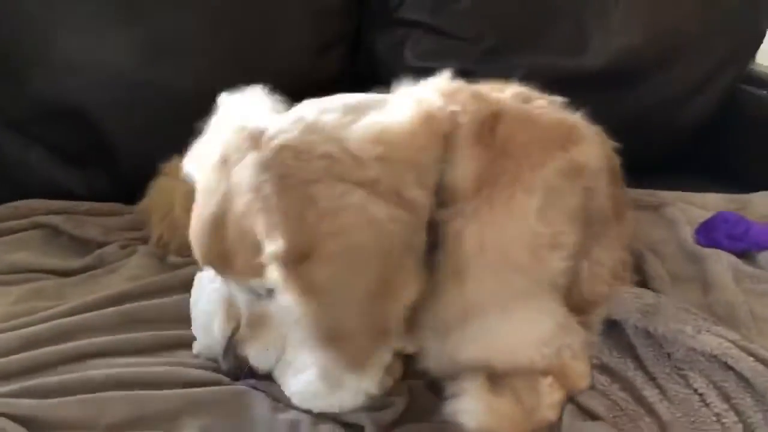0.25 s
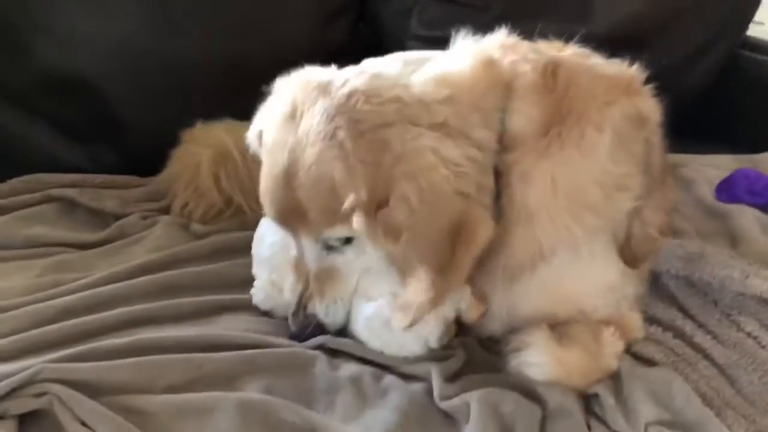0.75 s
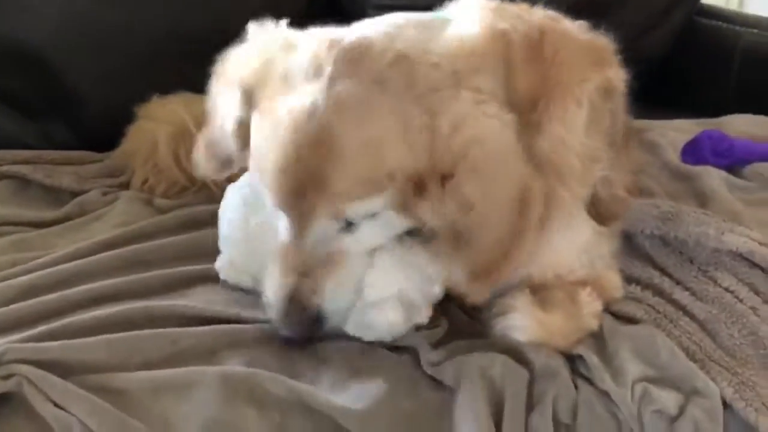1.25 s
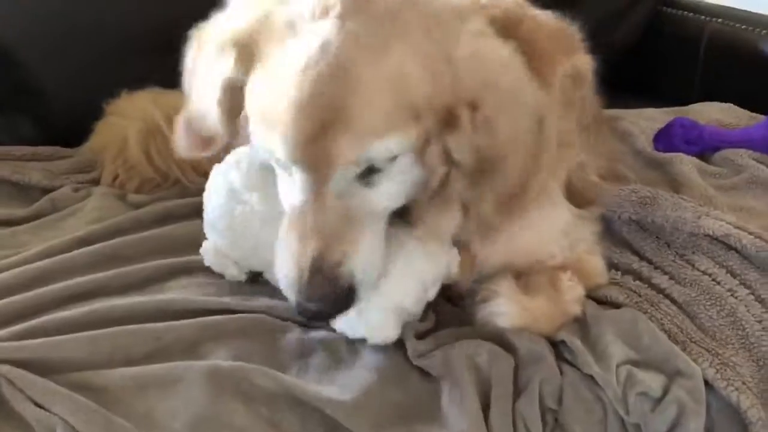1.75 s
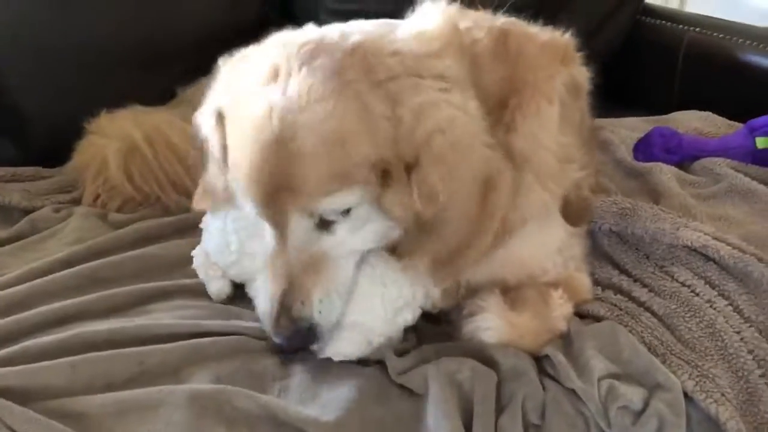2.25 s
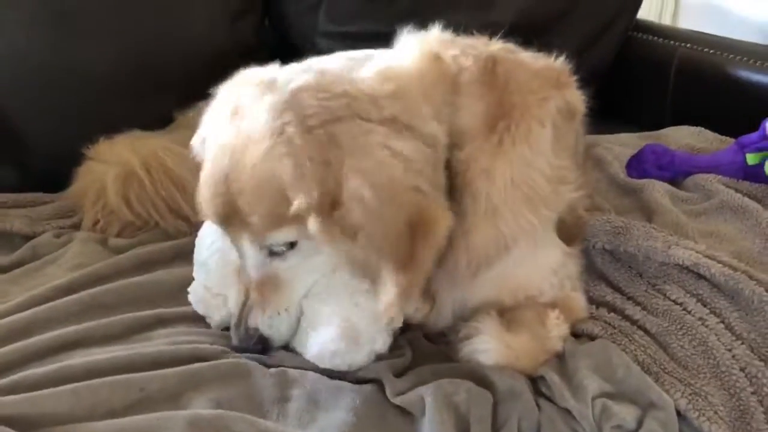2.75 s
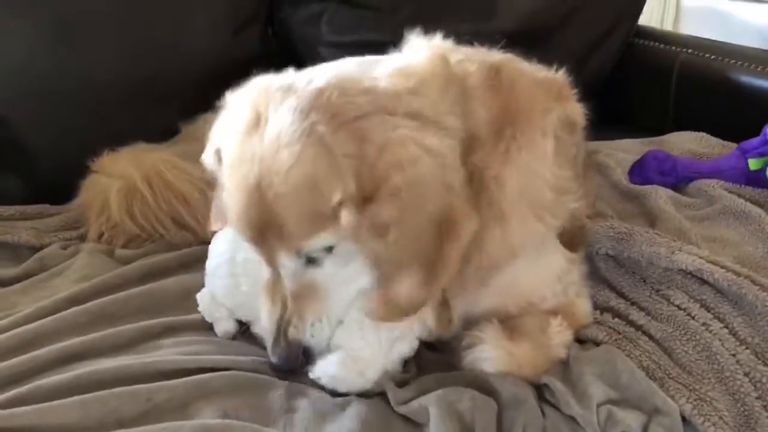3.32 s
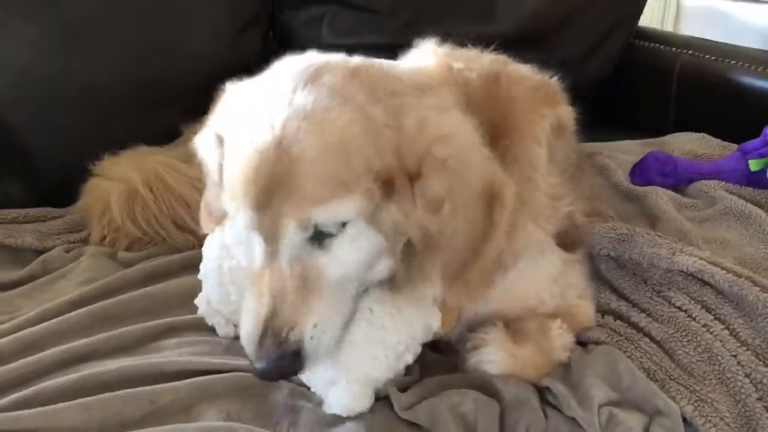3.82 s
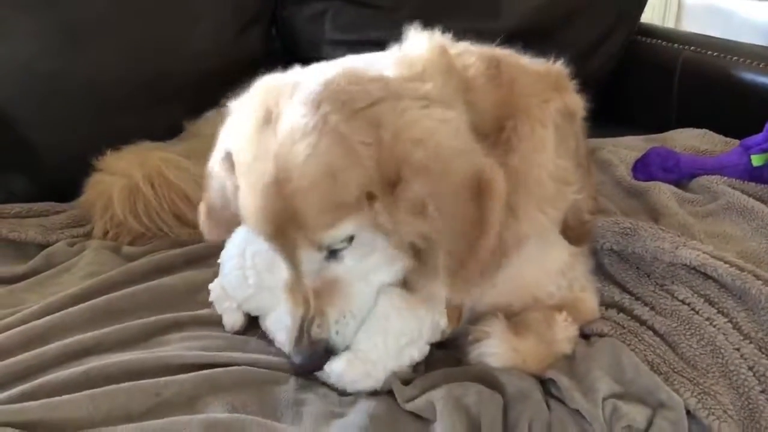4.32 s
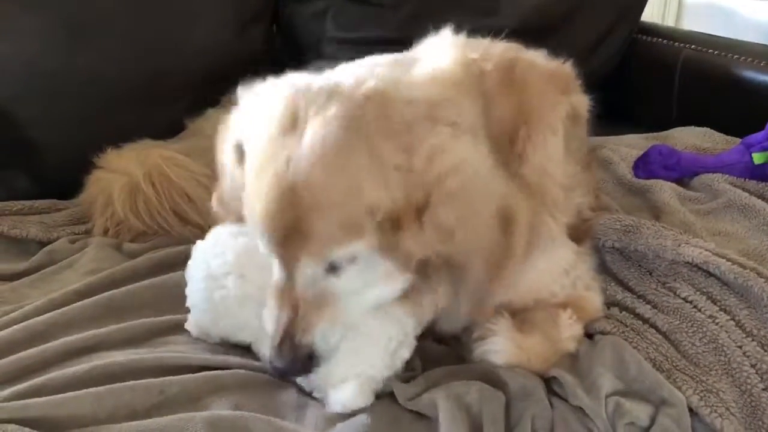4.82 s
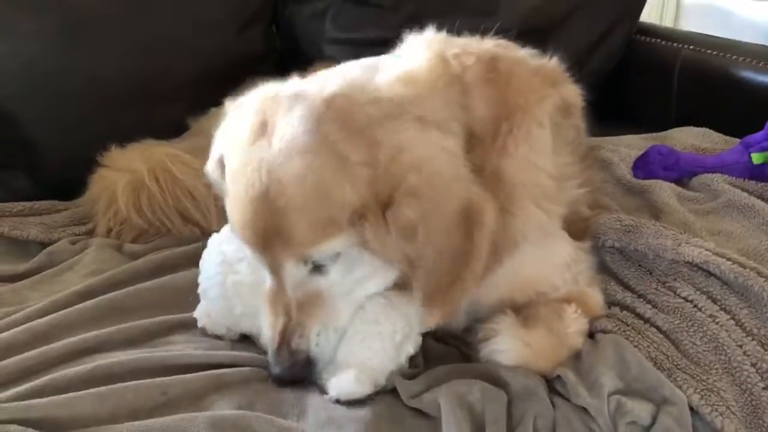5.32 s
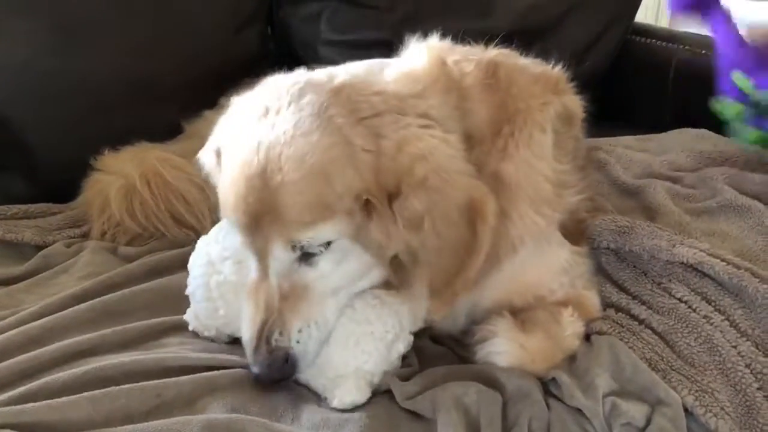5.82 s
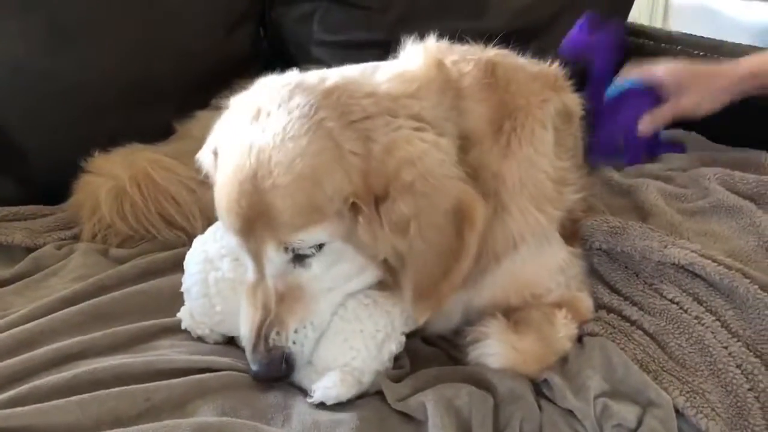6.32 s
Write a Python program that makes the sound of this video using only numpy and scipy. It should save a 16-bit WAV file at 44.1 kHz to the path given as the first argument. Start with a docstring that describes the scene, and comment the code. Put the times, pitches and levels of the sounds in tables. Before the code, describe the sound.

Close to the microphone, a dog chews a plush squeaker toy on a sofa. Each bite gives a brief, harsh, hissy squeak; most are followed by a rounder, cleaner squeak as air is sucked back in. Small pops, tooth clicks, plush rubs and soft cushion thuds fall between, with faint rustling. The room is quiet, with brief reflections and a low background hum.

```python
"""Living room: a dog on a sofa chews a squeaky plush toy, close to the microphone.
Each bite blows the squeaker's reed (harsh, pitch lifted by jaw surges); each release sucks air back
through it (rounder: rise, hold, fall). Both are beating tones with pipe-coloured overtones and hiss.
Resonant noise bursts give pops, tooth clicks, thuds and rubs; coloured noise gives rustle and room tone.
Sofa, wall and furniture add brief echoes."""
import sys
import numpy as np
from scipy import signal
from scipy.fft import rfft, irfft
from scipy.io import wavfile
from scipy.ndimage import map_coordinates

SR = 44100
rng = np.random.default_rng(int(sys.argv[2]) if len(sys.argv) > 2 else 0)


def to_wav(s):
    """Save 16-bit WAV."""
    ch = np.atleast_2d(s).T  # columns
    pcm = np.round(np.clip(ch, -1, 1) * 32767)  # PCM
    wavfile.write(sys.argv[1], SR, pcm.astype(np.int16))


N = 289911
TIME_S = np.arange(N) / SR
TOP_HZ = 15900

# Room background spectrum: [hz, relative_db_per_hz]
ROOM_TONE_COLOUR = [(15, -50), (25, -30), (55, -4.5), (78, -8), (104, 1), (178, -9), (209, -5.5), (281, -7),
                    (331, -9), (631, -16), (684, -24), (1900, -29), (2700, -29.5), (4500, -32.5),
                    (6050, -32), (8580, -35), (15500, -37.5)]
ROOM_TONE_DB = -64
# Room reverberation by band: [centre_hz, t60_s, level_db]
ROOM_BANDS = [(250, 0.79, -5), (1285, 0.45, -12.5), (2280, 0.39, -7), (4400, 0.5, -16), (8000, 0.34, -14),
              (14000, 0.13, -5.5)]
# First bounces off the leather sofa and the wall behind it: [delay_s, level_db]
BOUNCES = [(.0031, -38.5), (.0058, -19), (.0089, -17), (0.0149, -16.5)]
# Dense short echo from cushions and furniture close by
SCATTER_T60_S, SCATTER_DB, SCATTER_HIGHPASS_HZ = 0.039, -13.5, 2290

# Fur and fabric rustle as the dog shifts its grip: [centre_s, half_width_s, level_db]
SHIFTS = [(.05, 0.23, -71.5), (.68, 0.13, -65), (1.78, 0.25, -60), (2.34, 0.11, -64), (2.61, .17, -60),
          (3.1, 0.48, -69), (3.74, 0.051, -56), (4.06, 0.12, -62), (4.69, .15, -58.5), (5.14, 0.17, -58.5),
          (5.7, .17, -57), (6.2, 0.4, -60)]
RUSTLE_REST_DB = -72
# Rustle spectrum: [hz, relative_db]
RUSTLE_COLOUR = [(100, -20), (220, -1), (420, 0.5), (700, -2), (1300, -1.5), (2000, -9), (6000, -14.5),
                 (15000, -28.5)]
# Cushion takes the dog's weight: [start_s, level_db]
THUDS = [(0.427, -49), (5.253, -52), (6.396, -51.5), (6.539, -48.5)]
# Plush catches and drags over teeth and blanket: [start_s, length_s, centre_hz, width_hz, level_db]
RUBS = [(2.521, 0.048, 740, 453.6, -45.5), (2.522, 0.038, 285, 220, -55), (3.925, 0.13, 337, 184.3, -61),
        (4.641, 0.07, 370, 280, -50.5), (4.641, 0.039, 745, 800, -56), (6.512, 0.11, 860, 656, -50),
        (6.511, 0.077, 288, 300, -52.5)]
# Teeth click: [start_s, peak_db]
TICKS = [(1.039, -50), (1.475, -53), (2.522, -51), (2.806, -45), (4.642, -39), (4.767, -46)]
# Bulb pops back into shape: [start_s, peak_db]
POPS = [(1.039, -45.5), (1.475, -40.5), (1.527, -37), (2.045, -43), (2.251, -31.5), (2.807, -38),
        (3.642, -35), (4.432, -35.5), (5.107, -38), (5.691, -38), (6.294, -37)]

# Air too slow to sound the reed, hiss or faint whistle:
# [start_s, length_s, centre_hz, width_hz, level_db]
SLOW_AIR = [(.62, .19, 1700, 3500, -63), (.62, .19, 5500, 6000, -66), (5.81, .11, 1400, 1000, -56),
            (5.83, .45, 1320, 140, -59), (6.495, .06, 890, 130, -51)]
# Jaw closes and presses air out; levels hold at REFERENCE_HZ, hiss is relative to the overtones:
# [start_s, length_s, fade_s, fundamental_db, overtones_db, tilt_db_per_octave, hiss_db]
BITES = [(0.56, 0.029, 0.015, -34.5, -39, 1.5, -20), (1.39, 0.036, 0.0037, -33.5, -32.5, -1, -17),
         (1.506, 0.021, 0.01, -33, -33.5, -1, -23), (1.975, 0.096, 0.033, -32, -33, 2, -14.5),
         (2.575, .093, 0.032, -37.5, -40, -3, -15), (3.275, 0.04, 0.018, -34.5, -33.5, 1.5, -18.5),
         (3.382, 0.077, 0.014, -36, -37, -1.5, -15), (4.123, 0.093, 0.022, -33, -34, -1, -16),
         (4.858, .064, 0.036, -33.5, -30.5, 2.5, -24), (5.35, 0.1, 0.033, -34, -33.5, 0.3, -23),
         (5.966, .1, 0.037, -36, -34, -0.5, -18)]
# Bulb refills; levels hold at REFERENCE_HZ, late_hz is the pitch before the fall:
# [start_s, length_s, rise_s, top_hz, fall_s, late_hz, fundamental_db, overtones_db, tilt_db_per_octave]
RELEASES = [(1.048, .087, 0.02, 1228, 0.021, 1085, -35.5, -45, 3),
            (1.534, 0.1, 0.028, 1343, 0.019, 1116, -33, -41.5, 3),
            (2.243, 0.11, 0.042, 1338, 0.04, 1411, -32, -38.5, 1.5),
            (2.812, 0.11, 0.034, 1456, 0.025, 1159, -36, -44, 1.5),
            (3.648, 0.12, 0.027, 1262, .02, 1243, -35, -40, 2),
            (4.433, 0.11, 0.028, 1353, 0.033, 1249, -33.5, -39, 0.5),
            (5.109, .043, .025, 1200, .018, 1191, -33.5, -37.5, 4),
            (5.683, 0.13, 0.047, 1278, 0.035, 1160, -35, -41, 0),
            (6.281, .13, 0.03, 1134, 0.042, 1107, -34.5, -44, 1)]
# Surges of jaw pressure lift the reed's pitch: [centre_s, half_width_s, rise_hz]
SURGES = [(0.57, 0.0095, 50), (1.424, .017, 3354), (1.509, 0.0077, 3464), (1.999, 0.0098, 683),
          (2.018, .015, 250), (2.039, 0.0099, 530), (2.596, .011, 290.7), (2.622, .022, 209),
          (2.645, .014, 312.3), (3.294, .012, 247), (3.404, .016, 55), (3.447, .012, 47),
          (4.156, .019, 1200), (4.185, 0.013, 2800), (4.879, 0.013, 235), (5.373, .014, 253),
          (5.411, 0.021, 143), (5.989, .014, 87), (6.022, .022, 195)]
# Squeaker's pipe through the plush, air blown out: [hz, relative_db]
BITE_COLOUR = [(1700, -5), (2150, -14), (3100, -10.5), (4300, -10), (5500, -8), (7300, -5.5), (8300, -10),
               (9400, -22.5), (10500, -21.5), (11500, -34), (12800, -28.5), (15500, -36.5)]
# Same, air sucked in: [hz, relative_db]
RELEASE_COLOUR = [(2100, -8), (3300, -6), (4400, -9.5), (5100, -6.5), (5800, -25.5), (6300, -32),
                  (6900, -7.5), (7700, -7.5), (8800, -9), (9400, -19), (12600, -27.5), (15000, -34)]
# Fundamental against pitch as the reed is overblown; at the top the bare pipe whistles: [hz, gain_db]
TONE_COLOUR = [(1250, 0), (1650, -1.5), (2400, -5.5), (3500, -4), (4300, -1)]

# Pitch where the reed catches and stalls
BITE_CATCH_HZ, BITE_STALL_HZ = 923.6, 830.4
RELEASE_CATCH_HZ, RELEASE_STALL_HZ = 1057, 956
ATTACK_S, STOP_S = 0.0023, 0.0013
# Levels swell with pressure until the reed swings fully
REFERENCE_HZ, FULL_SWING_HZ, BUZZ_SWELL_DB_PER_OCTAVE = 1000, 1208, 13.5
# Squeezed harder still, the reed is pinned and stops buzzing
PINNED_HZ, PINNED_DB_PER_OCTAVE = 3330, -88
# The release fundamental sags as the bulb refills
RELEASE_SAG_DB_PER_S = -27


def undb(db):
    """Decibels to gain."""
    return 10 ** (np.asarray(db) / 20)


def unit(x):
    """Scale to rms 1."""
    return x / np.sqrt(np.mean(x ** 2) + 1e-20)


def on_log_axis(hz, points):
    """Interpolate (hz, value) points on a log-frequency axis."""
    points_hz, values = np.transpose(points)
    return np.interp(np.log(hz + 1e-3), np.log(points_hz), values)


def octaves_above(hz, limit_hz):
    """Octaves over a limit; zero below it."""
    return np.maximum(np.log2(hz / limit_hz), 0)


def bins_hz(size):
    """Bin frequencies of a real spectrum."""
    return np.arange(size // 2 + 1) * SR / size


def coloured(points, size):
    """Noise with a (hz, db) spectrum, rms 1."""
    spectrum = rfft(rng.standard_normal(size))
    return unit(irfft(spectrum * undb(on_log_axis(bins_hz(size), points)), size))


def resonate(x, centre_hz, width_hz):
    """Pass through one resonance twice."""
    b, a = signal.iirpeak(min(centre_hz, .45 * SR), centre_hz / width_hz, fs=SR)
    once = signal.lfilter(b, a, x)
    return signal.lfilter(b, a, once)


def highpass(x, order, cutoff_hz):
    """Butterworth high-pass."""
    return signal.sosfilt(signal.butter(order, cutoff_hz, "highpass", fs=SR, output="sos"), x)


def wander(rate_hz, size):
    """Smooth random curve through normal knots at rate_hz, spread near 1."""
    knots = rng.standard_normal(int(size / SR * rate_hz) + 4)
    return map_coordinates(knots, [np.arange(size) * rate_hz / SR], order=3, mode="nearest")


def swell(t, centre_s, half_width_s):
    """Gaussian rise and fall, 1 at its centre, 1/e at the half width."""
    return np.exp(-((t - centre_s) / half_width_s) ** 2)


def burst(length_s, centre_hz, width_hz, attack_s):
    """Resonant noise, rms 1 before an envelope that falls to 1/e near length_s."""
    t = np.arange(int(2 * length_s * SR)) / SR
    ringing = unit(resonate(rng.standard_normal(len(t)), centre_hz, width_hz))
    return ringing * (1 - np.exp(-t / attack_s)) * np.exp(-(t / length_s) ** 4)


def knock(peak_db, decay_s, centre_hz, width_hz, size=4096):
    """Short damped blow: decaying noise rings a resonance, scaled to a peak."""
    t = np.arange(size) / SR
    blow = resonate(rng.standard_normal(size) * np.exp(-t / decay_s), centre_hz, width_hz)
    return blow / np.abs(blow).max() * undb(peak_db)


def add(track, start_s, sound):
    """Mix a sound in at a time."""
    i = max(int(start_s * SR), 0)
    track[i:i + len(sound)] += sound[:max(N - i, 0)]


def room_tone():
    """Quiet background: coloured noise with a slow level drift."""
    return coloured(ROOM_TONE_COLOUR, N) * undb(ROOM_TONE_DB + 0.5 * wander(5.74, N))


def room(x, size=32768):
    """Walls and furniture scatter the sound; each band decays at its own rate, the top fastest."""
    t, hz = np.arange(size) / SR, bins_hz(size)
    noise = rfft(rng.standard_normal(size))
    centres_hz = [row[0] for row in ROOM_BANDS]
    tail = 0
    # each identity row makes one band of a crossfading set
    for share, (_, t60_s, level_db) in zip(np.eye(len(ROOM_BANDS)), ROOM_BANDS):
        decay = undb(-60 * t / t60_s) * np.clip((t - .003) / 0.00067, 0, 1)
        band = irfft(noise * on_log_axis(hz, list(zip(centres_hz, share))), size)
        tail = tail + undb(level_db) * band * decay / np.sqrt(np.sum(decay ** 2))
    return signal.fftconvolve(x, tail)[:N]


def scatter(x, size=4096):
    """Nearby cushions and furniture return a dense, mostly treble echo that blurs each glide."""
    t = np.arange(size) / SR
    decay = undb(-60 * t / SCATTER_T60_S) * np.clip((t - .003) / 0.0018, 0, 1)
    echoes = rng.standard_normal(size) * decay
    echoes = echoes / np.sqrt(np.sum(echoes ** 2))
    bright = highpass(x, 2, SCATTER_HIGHPASS_HZ)
    return undb(SCATTER_DB) * signal.fftconvolve(bright, echoes)[:N]


def bounces(x):
    """Near, flat surfaces mirror treble more than bass, doubling each glide."""
    bright = highpass(x, 1, 1500)
    out = np.zeros(N)
    for delay_s, level_db in BOUNCES:
        add(out, delay_s, undb(level_db) * bright)
    return out


def rustle():
    """Fur and fabric friction: uneven coloured noise that swells with each shift of grip."""
    movement = undb(RUSTLE_REST_DB)
    for centre_s, half_width_s, level_db in SHIFTS:
        movement = movement + undb(level_db) * swell(TIME_S, centre_s, half_width_s)
    return coloured(RUSTLE_COLOUR, N) * movement * undb(2.87 * wander(25, N))


def cushion_thuds():
    """Weight on the cushion excites a low, soft resonance."""
    out = np.zeros(N)
    for start_s, level_db in THUDS:
        thud = burst(length_s=0.039, centre_hz=98, width_hz=70, attack_s=0.002)
        add(out, start_s, undb(level_db) * thud)
    return out


def plush_rubs():
    """Catching, dragging plush: resonant noise with a fast, uneven level."""
    out = np.zeros(N)
    for start_s, length_s, centre_hz, width_hz, level_db in RUBS:
        rub = burst(length_s, centre_hz, width_hz, attack_s=0.00082)
        add(out, start_s, rub * undb(level_db + 1.8 * wander(213, len(rub))))
    return out


def tooth_ticks():
    """Teeth click: short, broad treble knocks."""
    out = np.zeros(N)
    for start_s, peak_db in TICKS:
        add(out, start_s, knock(peak_db, decay_s=0.0044, centre_hz=2500, width_hz=6900))
    return out


def bulb_pops():
    """The bulb snaps back into shape: short, broad knocks of lower pitch."""
    out = np.zeros(N)
    for start_s, peak_db in POPS:
        add(out, start_s, knock(peak_db, decay_s=0.0018, centre_hz=664, width_hz=1180))
    return out


def slow_air():
    """Flow too weak to sound the reed: noise hisses in broad bands, whistles in narrow ones."""
    out = np.zeros(N)
    for start_s, length_s, centre_hz, width_hz, level_db in SLOW_AIR:
        add(out, start_s, undb(level_db) * burst(length_s, centre_hz, width_hz, attack_s=0.0074))
    return out


def bite_pitch(start_s, length_s):
    """The reed sags from catching to stalling; each jaw surge lifts it."""
    t = start_s + np.arange(int(length_s * SR)) / SR
    sag_hz = np.linspace(BITE_CATCH_HZ, BITE_STALL_HZ, len(t))
    return sag_hz + sum(rise_hz * swell(t, at_s, width_s) for at_s, width_s, rise_hz in SURGES)


def release_pitch(length_s, rise_s, top_hz, fall_s, late_hz):
    """Suction builds quickly, holds while the bulb unfolds, then runs out."""
    t = np.arange(int(length_s * SR)) / SR
    hold_end_s = max(length_s - fall_s, rise_s + 1 / SR)
    held_hz = np.interp(t, [rise_s, hold_end_s, length_s], [top_hz, late_hz, RELEASE_STALL_HZ])
    return held_hz - (top_hz - RELEASE_CATCH_HZ) * np.clip(1 - t / rise_s, 0, 1) ** 2


def squeak(pitch_hz, colour, tone_db, buzz_db, tilt_db, tone_swell_db, fade_s, fade_db,
           jitter, flutter_db, waver_db, hiss_db, count=18):
    """Beating reed: strong fundamental, pipe-shaped overtones, air hissing once a cycle."""
    size = len(pitch_hz)
    t = np.arange(size) / SR
    left_s = t[-1] - t

    # pressure, read from pitch in octaves, sets loudness; the squeak fades as the air runs out
    pressure = np.log2(np.minimum(pitch_hz, FULL_SWING_HZ) / REFERENCE_HZ)
    spent_db = fade_db * np.clip(1 - left_s / fade_s, 0, 1)
    low_db = tone_db + tone_swell_db * pressure + spent_db + on_log_axis(pitch_hz, TONE_COLOUR)
    pinned_db = PINNED_DB_PER_OCTAVE * octaves_above(pitch_hz, PINNED_HZ)
    blow_db = buzz_db + BUZZ_SWELL_DB_PER_OCTAVE * pressure + spent_db + pinned_db

    # blown harder, the reed beats more unevenly and the air tears more
    strain = np.clip(undb(blow_db + 35), .7, 1.7)
    pitch = pitch_hz * np.exp(jitter * strain * wander(967, size) + 0.00285 * wander(93, size))
    phase = 2 * np.pi * np.cumsum(pitch) / SR

    overtones, power = np.zeros(size), 1e-12
    for k in range(2, count):
        overtone_hz = k * pitch
        tilt_octaves = np.log2(np.minimum(overtone_hz, 8000) / REFERENCE_HZ)
        level_db = on_log_axis(overtone_hz, colour) + tilt_db * tilt_octaves
        # plush shifts over the opening: each overtone drifts and flutters by itself
        gain = undb(level_db + 2.43 * wander(24.3, size)) * (overtone_hz < TOP_HZ)
        flutter = undb(flutter_db * wander(148.6, size))
        offset = rng.uniform(-np.pi, np.pi) / 2
        overtones += gain * flutter * np.cos(k * phase + offset)
        power = power + gain ** 2 / 2

    hiss_colour = [(300, -44), (1000, -52)] + list(colour)
    hiss = unit(coloured(hiss_colour, size) * (1 + 0.37 * np.cos(phase)))
    buzz = overtones / np.sqrt(power) + undb(hiss_db) * strain * hiss
    tone = np.sqrt(2) * np.sin(phase) * undb(waver_db * wander(99.4, size))

    # linear ramps as the reed catches and stops
    edges = np.clip(np.minimum(t / ATTACK_S, left_s / STOP_S), 0, 1)
    return edges * (tone * undb(low_db) + buzz * undb(blow_db))


def bite_squeaks():
    """Air pressed out: the reed runs rough and hissy."""
    out = np.zeros(N)
    for start_s, length_s, fade_s, tone_db, buzz_db, tilt_db, hiss_db in BITES:
        pitch_hz = bite_pitch(start_s, length_s)
        add(out, start_s, squeak(
            pitch_hz, BITE_COLOUR, tone_db, buzz_db, tilt_db, tone_swell_db=6, fade_s=fade_s,
            fade_db=-7.5, jitter=0.0096, flutter_db=3, waver_db=2.04, hiss_db=hiss_db))
    return out


def release_squeaks():
    """Air sucked in as the bulb refills: the reed runs cleaner, its fundamental sagging."""
    out = np.zeros(N)
    for start_s, length_s, rise_s, top_hz, fall_s, late_hz, tone_db, buzz_db, tilt_db in RELEASES:
        pitch_hz = release_pitch(length_s, rise_s, top_hz, fall_s, late_hz)
        # sag pivots at mid-length
        sag_db = RELEASE_SAG_DB_PER_S * (np.arange(len(pitch_hz)) / SR - length_s / 2)
        add(out, start_s, squeak(
            pitch_hz, RELEASE_COLOUR, tone_db + sag_db, buzz_db, tilt_db, tone_swell_db=9, fade_s=0.025,
            fade_db=-10, jitter=0.0051, flutter_db=2.5, waver_db=1.68, hiss_db=-28))
    return out


def scene():
    """Sofa, dog and toy with their echoes, over the room tone."""
    sofa = rustle() + cushion_thuds() + plush_rubs()
    knocks = tooth_ticks() + bulb_pops()
    squeaker = slow_air() + bite_squeaks() + release_squeaks()
    near = sofa + knocks + squeaker
    echoes = bounces(near) + scatter(near) + room(near)
    return (room_tone() + near + echoes)[None]


def record(dry):
    """The recorder cuts the top: steep elliptic low-pass at TOP_HZ."""
    return signal.sosfilt(signal.ellip(10, .2, 70, TOP_HZ, fs=SR, output="sos"), dry)


dry = scene()
out = record(dry)
to_wav(out)
```